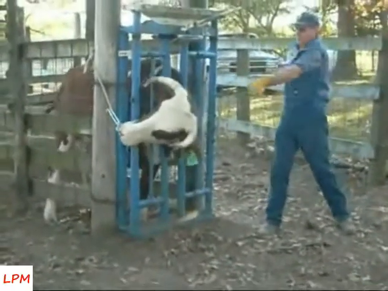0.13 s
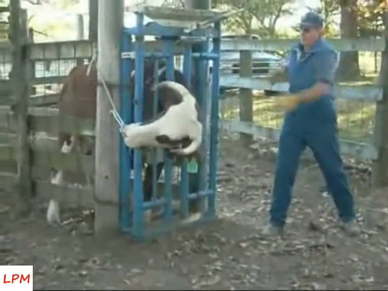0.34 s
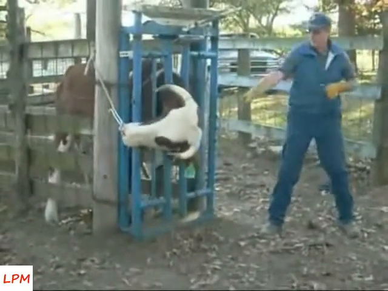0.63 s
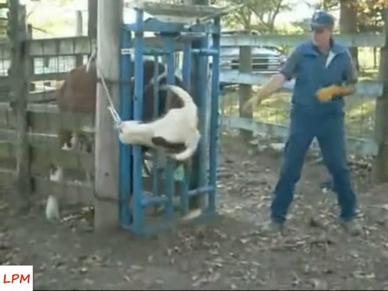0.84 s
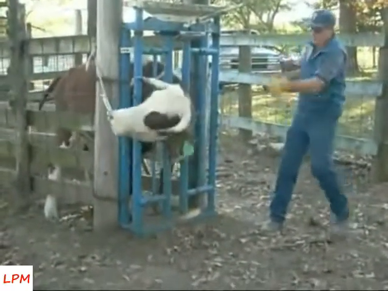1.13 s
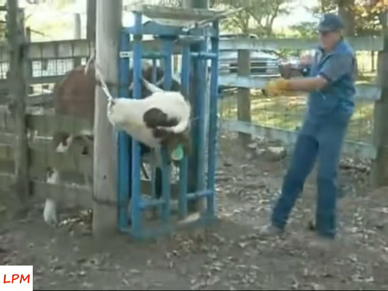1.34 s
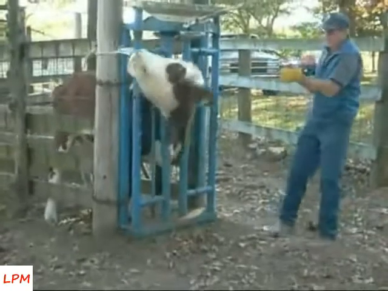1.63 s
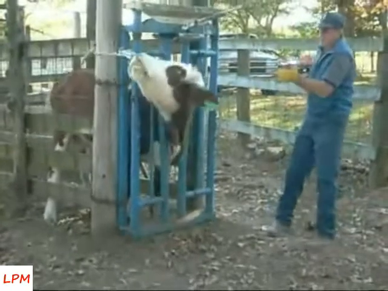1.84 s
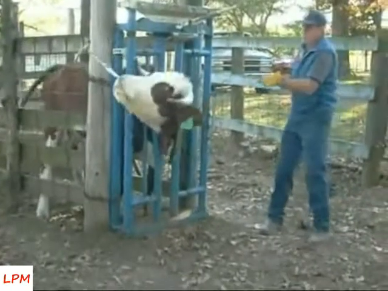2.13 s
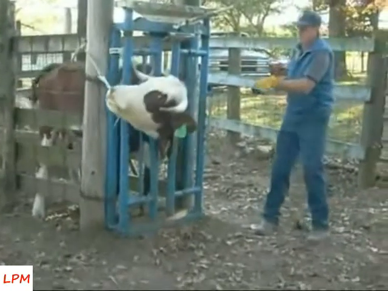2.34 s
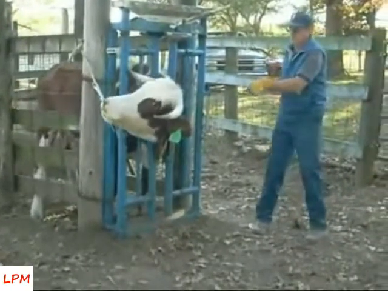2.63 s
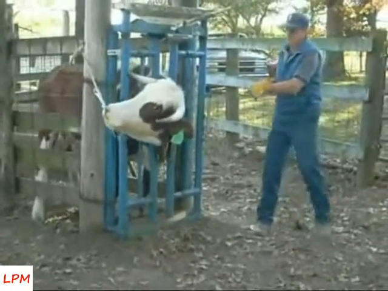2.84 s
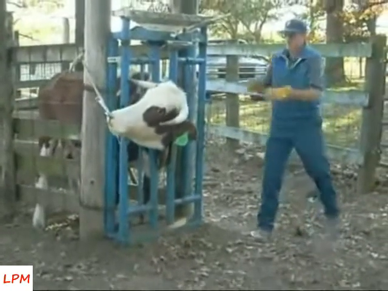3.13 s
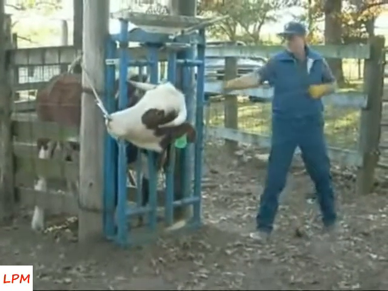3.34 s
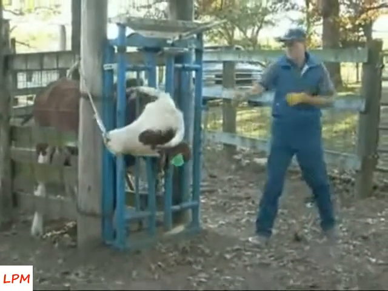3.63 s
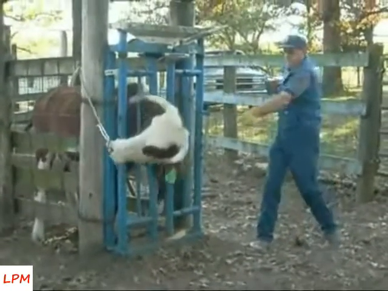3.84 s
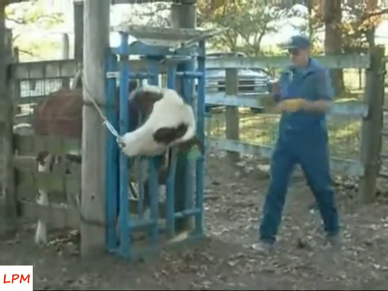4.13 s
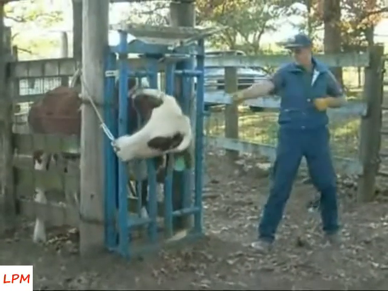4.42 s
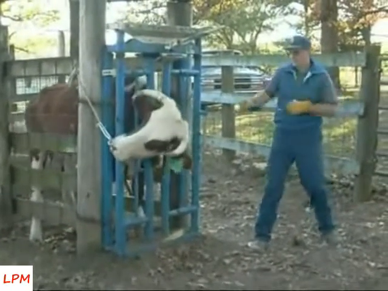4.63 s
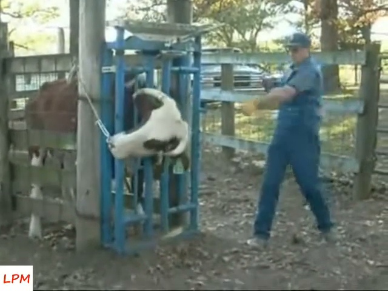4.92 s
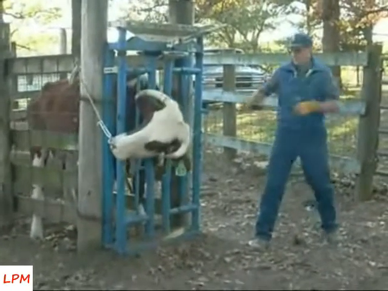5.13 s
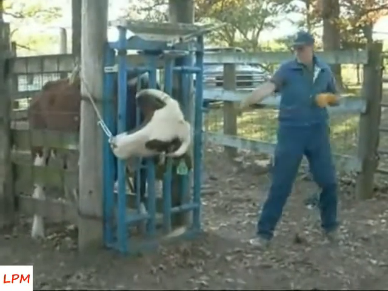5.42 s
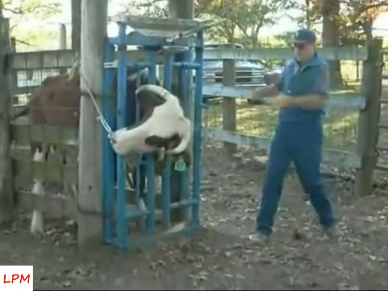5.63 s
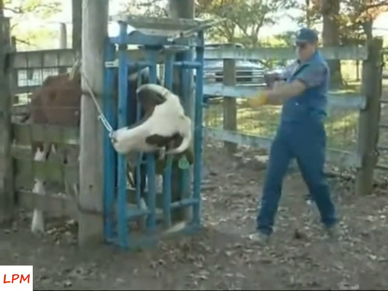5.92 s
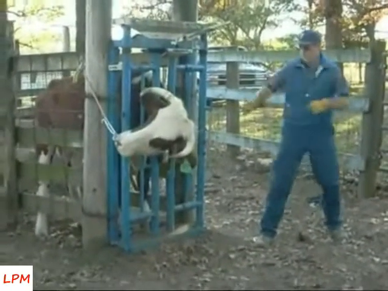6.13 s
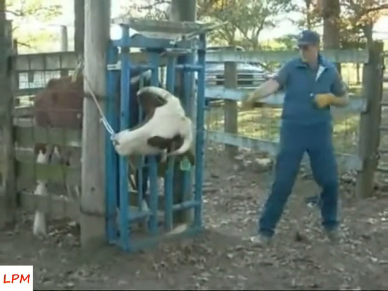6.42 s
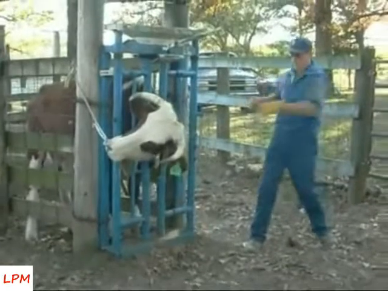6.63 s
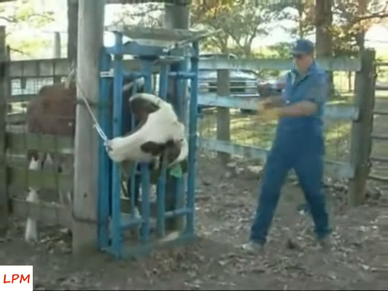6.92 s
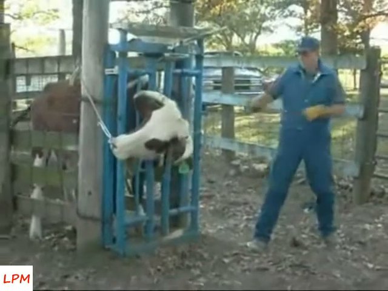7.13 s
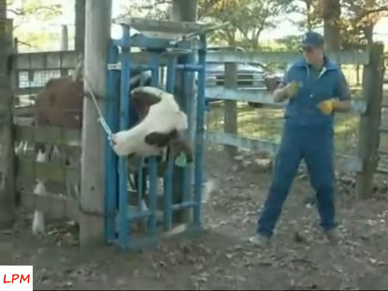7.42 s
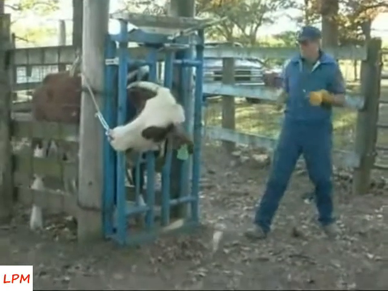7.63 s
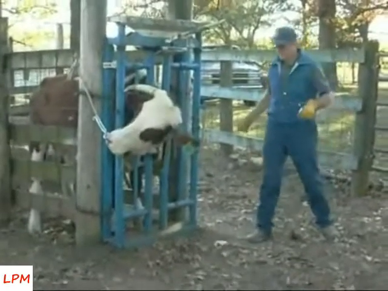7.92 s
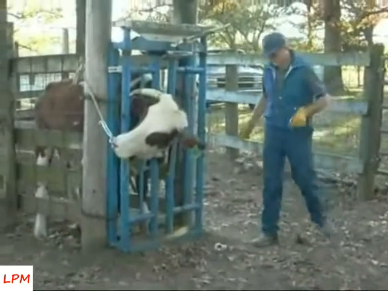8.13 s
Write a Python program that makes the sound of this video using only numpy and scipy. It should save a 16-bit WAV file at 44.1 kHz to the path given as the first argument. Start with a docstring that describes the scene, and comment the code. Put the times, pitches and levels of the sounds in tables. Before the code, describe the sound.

A wire saw rasps back and forth through a calf's horn, interrupted by loud clanks and rattles from a steel chute.

```python
"""A wire saw rasps to and fro through a calf's horn, about two strokes a second, whirring as it tightens.
The calf struggles in its steel chute: the head gate squeals by stick-slip friction, impacts set gate,
panels and floor clanking in their damped modes, and one bar rings on. Hide, rope and dry leaves rustle.
A hoof and, near the end, the cut horn knock dully on the dirt.
A thin outdoor hiss and a far engine lie underneath."""
import sys
import numpy as np
from scipy import signal
from scipy.fft import rfft, irfft, next_fast_len
from scipy.io import wavfile
from scipy.ndimage import uniform_filter1d, minimum_filter1d, map_coordinates

SR = 44100
rng = np.random.default_rng(int(sys.argv[2]) if len(sys.argv) > 2 else 0)


def materialize(psi):
    """Save the field psi as 16-bit PCM at rate SR to the path in sys.argv[1].

    A 1-D psi becomes a single channel; in a 2-D psi each row is a channel.
    """
    bounded = np.clip(np.atleast_2d(psi).T, -1, 1)
    quanta = np.round(bounded * 32767).astype(np.int16)
    wavfile.write(sys.argv[1], SR, quanta)


N = 364707


# Pulls of the saw: start_s, end_s, strength_db
SAW_STROKES = [(0, 0.278, -44), (0.475, 0.799, -44), (3.188, 3.556, -45), (3.673, 3.992, -43.5),
               (4.133, 4.548, -44), (4.652, 4.992, -44.5), (5.117, 5.476, -46), (5.601, 5.961, -48),
               (6.027, 6.411, -50.5), (6.483, 6.938, -53), (6.967, 7.339, -52), (7.218, 7.558, -52.5)]
# Spectrum of wire cutting horn: frequency_hz, level_db
RASP_SPECTRUM = [(180, -51.5), (300, -31), (382, -37), (437, -15.5), (524, -19.5), (618, -15), (677, -23),
                 (915, -12.5), (1260, -16.5), (1570, -10.5), (2360, -9), (3200, 2), (3950, -13),
                 (10200, -45), (11000, -57.5), (14300, -81), (22000, -120)]

def wire_saw(firm_db=-44.5, start_hz=520, top_hz=973, hz_per_db=12, upper_hz=1680, zing_hz=2750):
    """Friction noise: twisted wire rasps through horn, and its whirr climbs and grows with tension."""
    out = np.zeros(N)
    for start, end, strength_db in SAW_STROKES:
        effort_db = strength_db - firm_db
        size = int((end - start) * SR)
        progress = np.linspace(0, 1, size)
        speed = np.abs(np.sin(np.pi * progress))
        tension = np.sin(np.pi / 2 * progress / 0.69)  # slackens after 69% of the stroke
        low_hz = start_hz + (top_hz - start_hz) * tension + hz_per_db * effort_db
        stretch = 1 + 0.11 * (speed - speed.mean()) - 0.0601 * (progress - 0.5)
        grip = amp(3.5 * np.array([wobble(22, size) for _ in range(3)]))
        low = grip[0] * narrow_noise(low_hz, width_hz=150)
        upper = grip[1] * narrow_noise(upper_hz * stretch, width_hz=150)
        zing = grip[2] * narrow_noise(zing_hz * stretch, width_hz=200)
        # The higher resonances need a tight wire and a firm pull.
        bite = speed ** 1.22 * progress * amp(0.52 * effort_db)
        whirr = amp(-7) * speed * low + bite * (amp(2) * upper + amp(3) * zing)
        grit = patchy(noise(RASP_SPECTRUM, grain_db=1.5, size=size), depth_db=3)
        rasp = speed ** 1.12 * amp(strength_db + 1.7 * wobble(28.1, size)) * grit
        add(out, start, rasp + amp(-52.5 + 1.28 * effort_db) * whirr)
    return out


# Blows on the chute: start_s, ring_db, clatter_db, thump_db, clatter_t60_s
CHUTE_BLOWS = [(0.132, -37.5, -35.5, -61.5, 0.13), (0.158, -51, -35, -57, 0.13),
               (0.823, -23, -51, -73, .07), (0.908, -42, -46, -79, 0.24), (0.924, -32.5, -47, -80, .12),
               (0.981, -15, -21, -56, .18), (1.165, -12.5, -20.5, -46.5, 0.14),
               (1.340, -40, -36, -66, 0.38), (1.53, -38, -57, -68, .06), (1.74, -48.5, -35, -71, 0.39),
               (2.612, -45.5, -47, -83, .06), (3.902, -35, -33, -49, 0.28),
               (3.935, -29.5, -29.5, -54, 0.23), (3.972, -30.5, -34.5, -48, .25),
               (4.042, -31.5, -18.5, -25, .15), (4.083, -28, -31.5, -31.5, .15),
               (4.190, -44, -39, -49.5, 0.14), (4.329, -37, -42.5, -58, 0.19),
               (4.409, -35, -31.5, -64, 0.1), (5.104, -43.5, -38, -71, 0.11), (6.241, -41, -60, -83, .06)]

def rebounds(count=3, gap_s=0.009, t60_growth=1.46):
    """Inelastic rebound: each blow becomes a run of contacts, each weaker and looser than the last."""
    loss_db = np.array([5, 5, 9])  # ring, clatter, thump: rebounds hardly move the heavy floor
    return [(start + k * gap_s, *(np.array(levels_db) - k * loss_db), t60 * t60_growth ** k)
            for start, *levels_db, t60 in CHUTE_BLOWS for k in range(count)]


def shake(start_s=2.038, count=7, first_gap_s=0.023, gap_growth=1.16, t60_s=0.34):
    """Forced rattling: the calf throws its weight about, and slowing contacts build, hold and give out."""
    gaps = first_gap_s * gap_growth ** np.arange(count)
    starts = start_s + np.cumsum(gaps) - gaps
    onset_loss_db = 2 * 0.5 ** np.arange(count)
    fade_db = 14 * np.linspace(0, 1, count) ** 3
    levels_db = np.array([-20.5, -23, -48.5])  # ring, clatter, thump
    return [(start, *(levels_db - loss), t60_s) for start, loss in zip(starts, onset_loss_db + fade_db)]


# Modes of the gate's bars, the loose side panels and the floor: pitch_hz, level_db, t60_s
GATE_MODES = [(2094, -35.5, 0.89), (2260, -21.5, 0.12), (2480, -25, 0.26), (2555, -17.5, 0.24),
              (2710, -17.5, 0.2), (2934, -2, 0.11), (3043, -2, 0.11), (3100, -5, 0.034), (3143, 1.5, 0.077),
              (3180, -8, 0.15), (3248, -7.5, 0.2), (3340, -10.5, 0.19), (3675, -17.5, 0.14),
              (3570, -12, 0.14), (3735, -20, 0.16), (4340, -22.5, 0.18), (6700, -39.5, 0.16)]
PANEL_MODES = [(477, -17.5, 0.56), (528, -18, 0.71), (643, -14.5, 0.57), (1003, -19.5, 1), (1140, -22.5, 1),
               (1200, -22, 0.14), (1445, -18.5, 0.83), (1660, -20, 0.3)]
FLOOR_MODES = [(173, -7, 0.16), (196.4, -3.5, 0.16), (232.5, -4, 0.092), (317, -8.5, 0.16)]
# Spectra of the contact crack and the dense ring of panels and bars: frequency_hz, level_db
CRACK_SPECTRUM = [(900, -24), (3200, -1), (5000, -7), (8000, -9.5), (10800, -11.5)]
CLATTER_SPECTRUM = [(88, -69.5), (150, -22), (204, -35.5), (355, -20), (632, -8.5), (812, -14), (1010, -8),
                    (1790, -11), (2660, -8), (3180, 0), (3880, -9.5), (4240, -11.5), (5360, -22.5),
                    (6650, -26.5), (11000, -36.5), (14300, -82), (22000, -120)]

def chute_clanks():
    """Impact excitation: each contact cracks and sets the modes of gate, panels and floor ringing."""
    out, t = np.zeros(N), clock(0.6)
    attack = 1 - np.exp(-t / 0.00024)
    heave = 1 - np.exp(-t / 0.0017)  # panels and floor are slower to move
    for start, ring_db, clatter_db, thump_db, t60 in rebounds() + shake():
        crack = amp(-7 - 60 * t / 0.015) * noise(CRACK_SPECTRUM, size=len(t))
        gate = amp(ring_db) * (crack + ring(GATE_MODES, t, scatter_db=5.5, detune=0.002))
        rattle = amp(-60 * t / t60) * noise(CLATTER_SPECTRUM, grain_db=0.5, size=len(t))
        drive = amp(-3) * t60 / 0.41  # a longer rattle feeds more into the panels
        panel_ring = drive * heave * ring(PANEL_MODES, t, scatter_db=0, detune=0.0036)
        panels = amp(clatter_db) * (rattle + panel_ring)
        floor = amp(thump_db) * heave * ring(FLOOR_MODES, t, scatter_db=1.5, detune=0.01)
        cutoff_hz = 4200 * np.exp(0.039 * (ring_db + 32))  # harder blows are brighter
        add(out, start, low_pass(attack * (gate + panels + floor), cutoff_hz))
    return out


# Slips of steel on steel: start_s, length_s, level_db, start_hz, end_hz
GATE_SLIPS = [(0.816, 0.042, -8, 3040, 2898), (0.841, 0.043, -17, 2740, 2530),
              (1.093, 0.037, -32, 4820, 4820), (3.897, 0.04, -31, 663, 626), (3.906, .04, -9.5, 3080, 3047),
              (3.950, 0.025, -18, 3066, 3120), (3.984, .046, -19.5, 3110, 3130)]
# Spectrum of scraping steel: frequency_hz, level_db
SCRAPE_SPECTRUM = [(1200, -20), (2400, -13), (3200, 6), (4200, -3), (6000, -13), (8000, -17),
                   (10800, -29.5)]

def gate_squeals(peak_at=0.22, jitter=0.028, stutter_db=4, scrape_db=-19):
    """Stick-slip friction: the loaded gate gives a stuttering tone, a weak octave and a harsh scrape."""
    out = np.zeros(N)
    for start, length, level_db, start_hz, end_hz in GATE_SLIPS:
        size = int(length * SR)
        progress = np.linspace(0, 1, size)
        slip = np.sin(np.pi / 2 * np.interp(progress, [0, peak_at, 1], [0, 1, 0]))
        load = slip * np.clip(1 + (level_db + 12) / 26, 0.3, 1)
        glide_hz = start_hz + (end_hz - start_hz) * progress
        pitch_hz = glide_hz * (1 + jitter * load * wobble(450, SR)[:size])
        stutter = unit(amp(stutter_db * wobble(280, SR)[:size]))
        phase = 2 * np.pi * np.cumsum(pitch_hz) / SR
        tone = np.sin(phase) + load * amp(-26) * np.sin(2 * phase)
        scrape = amp(scrape_db) * noise(SCRAPE_SPECTRUM, size=SR // 8)[:size]
        add(out, start, amp(level_db) * slip * stutter * (tone + scrape))
    return out


def ringing_bar(start_s=2.09, stop_s=3.7, pitch_hz=622, level_db=-46, t60_s=6.1):
    """Free vibration: one lightly damped bar rings on after the shake, until a touch stops it."""
    out, t = np.zeros(N), clock(stop_s - start_s)
    edges = np.clip(np.minimum(t, t[-1] - t) / 0.0086, 0, 1)
    add(out, start_s, edges * amp(level_db - 60 * t / t60_s) * np.sin(2 * np.pi * pitch_hz * t))
    return out


# Knocks on the ground: start_s, thud_db, click_db, t60_s
GROUND_KNOCKS = [(2.895, -64.5, -70, 0.17), (6.415, -62.5, -79.5, 0.17), (7.733, -34, -39.5, 0.034),
                 (7.766, -53.5, -62, 0.034), (7.952, -57, -59, 0.032), (7.975, -62, -44.5, 0.099)]
# Spectra of the dull thud and its dry click: frequency_hz, level_db
THUD_SPECTRUM = [(53, -46), (90, -17), (209, 7.5), (368, -16), (545, 5.5), (843, -2), (1010, 5),
                 (1290, -18), (1750, -1), (2600, -14), (3380, -48), (5720, -120)]
CLICK_SPECTRUM = [(880, -13), (1500, -23), (2560, -21), (3260, -3), (3570, -11.5), (4430, -25), (9230, -41),
                  (11000, -62), (14300, -76), (22000, -120)]

def ground_knocks(gain=2.16):
    """Heavily damped impact: a hoof and the falling horn meet the dirt with a thud and a click."""
    out, t = np.zeros(N), clock(0.22)
    attack = 1 - np.exp(-t / 0.0009)
    for start, thud_db, click_db, t60 in GROUND_KNOCKS:
        thud = amp(thud_db) * noise(THUD_SPECTRUM, size=len(t))
        click = amp(click_db) * noise(CLICK_SPECTRUM, size=len(t))
        add(out, start, gain * attack * amp(-60 * t / t60) * (thud + click))
    return out


# Bouts of dry rustling: start_s, end_s, level_db, brightness_hz
RUSTLE_BOUTS = [(-0.1, 0.244, -44, 3080), (0.3, 0.8, -50, 3100), (0.89, 1.571, -42, 3310),
                (1.438, 1.99, -36, 3260), (1.8, 2.489, -44, 3230), (3.688, 4.351, -40.5, 3170),
                (6.106, 7.537, -51, 3390), (7.596, 8.444, -54.5, 3080)]
# Spectrum of the rustle: frequency_hz, level_db
RUSTLE_SPECTRUM = [(1060, -28.5), (1800, -18), (2020, -18), (2570, -10.5), (2880, -1), (3300, 2.5),
                   (3700, -11), (4110, -13), (5560, -25.5), (6420, -28), (7880, -37.5), (10100, -41.5),
                   (11000, -53), (14300, -85), (22000, -120)]

def rustling(faint_db=-58, settle_db_per_s=0.7, rise_s=0.2, fall_s=0.27, base_brightness_hz=3236):
    """Dry friction: hide, rope and leaves rub in bouts of noise over a faint, settling rustle."""
    t = np.arange(N) / SR
    rustle = amp(faint_db - settle_db_per_s * t) * noise(RUSTLE_SPECTRUM, grain_db=-0.5)
    for start, end, level_db, brightness_hz in RUSTLE_BOUTS:
        swell = np.clip(np.minimum((t - start) / rise_s, (end - t) / fall_s), 0, 1)
        spectrum = np.array(RUSTLE_SPECTRUM) * [brightness_hz / base_brightness_hz, 1]
        rustle += amp(level_db) * swell * noise(spectrum, grain_db=0.5)
    flutter = amp(0.68 * wobble(40))
    return np.std(rustle) * patchy(rustle, depth_db=1.5) * flutter


# Envelope of the body scraping along the chute: time_s, level_db
BODY_ENVELOPE = [(0.9, -53), (1.11, -56.5), (1.21, -44), (1.44, -51.5), (2.08, -54.5), (2.21, -46),
                 (2.44, -51), (2.64, -61.5), (3.1, -70)]
# Spectrum of hide on steel: frequency_hz, level_db
BODY_SPECTRUM = [(71, -63), (120, -24.5), (283, -13.5), (327, -25), (460, -4.5), (615, 2.5), (702, -8),
                 (1140, -3.5), (1770, -12.5), (2590, -13.5), (2800, -5.5), (3640, -28), (6160, -120)]

def body_scrape():
    """Sliding friction: the struggling calf drags its hide along the bars in grainy noise."""
    hide = patchy(noise(BODY_SPECTRUM, grain_db=3), depth_db=2.5)
    flutter = amp(1.8 * wobble(30))
    return envelope(BODY_ENVELOPE) * hide * flutter


# Tones of the engine: pitch_hz, level_db
ENGINE_TONES = [(70, -80), (104, -74.5)]

def far_engine(start_s=4.7, fade_s=0.43):
    """Periodic vibration: a far engine fades in as two low tones of wavering phase."""
    t = np.arange(N) / SR
    hum = sum(amp(db) * np.sin(2 * np.pi * hz * t + 0.25 * wobble(4.6)) for hz, db in ENGINE_TONES)
    return hum * np.clip((t - start_s) / fade_s, 0, 1)


# Spectrum of the outdoor air: frequency_hz, level_db
AIR_SPECTRUM = [(15, -27.5), (25, -10), (112, -6.5), (212, -11), (296, -11.5), (480, -8.5), (635, -4.5),
                (703, -9), (1230, -9.5), (3160, -9.5), (4990, -24), (10200, -21.5), (11000, -32),
                (14300, -65), (22000, -120)]

def outdoor_air(level_db=-66):
    """Stationary broadband noise: the open air gives a thin hiss."""
    return amp(level_db) * noise(AIR_SPECTRUM)


# Reverberation time of the yard: frequency_hz, t60_s
YARD_DECAY = [(150, .25), (600, 0.31), (3000, 0.54), (10000, 0.23)]

def yard_reverb(x):
    """Diffuse scattering: fences and trees return a short, exponentially decaying tail."""
    hz, t, spectra = signal.stft(rng.standard_normal(SR), SR, nperseg=256)
    decay = amp(-60 * t / along(YARD_DECAY, hz)[:, None])
    tail = signal.istft(spectra * decay, SR, nperseg=256)[1]
    return signal.fftconvolve(x, tail / np.linalg.norm(tail))[:N]


def ring(modes, t, scatter_db, detune):
    """Modal superposition: damped sines whose strength, sign and tuning vary from blow to blow."""
    hz, db, t60 = np.transpose(modes)[:, :, None]
    strength, shift, polarity = rng.standard_normal((3, len(modes), 1))
    waves = np.sign(polarity) * np.sin(2 * np.pi * hz * (1 + detune * shift) * t)
    return np.sum(amp(db + scatter_db * strength - 60 * t / t60) * waves, axis=0)


def noise(spectrum, grain_db=0, size=N):
    """Spectral shaping: coloured noise at rms 1, its power gathered in millisecond grains."""
    grains = rng.standard_normal(size) * amp(grain_db * wobble(500, size))
    return unit(filtered(grains, lambda hz: amp(along(spectrum, hz))))


def narrow_noise(hz, width_hz):
    """Quadrature modulation: a narrow band of noise follows a pitch."""
    phase = 2 * np.pi * np.cumsum(hz) / SR
    return unit(wobble(width_hz, len(hz)) * np.sin(phase) + wobble(width_hz, len(hz)) * np.cos(phase))


def patchy(x, depth_db):
    """Spectral modulation: short-lived resonances come and go; the result has rms 1."""
    spectra = signal.stft(x, nperseg=1024)[2]
    patches = uniform_filter1d(rng.standard_normal(spectra.shape), size=5, axis=0)
    patches = uniform_filter1d(patches, size=7, axis=1)
    return unit(signal.istft(spectra * amp(depth_db * unit(patches)), nperseg=1024)[1][:len(x)])


def low_pass(x, hz):
    """Causal low-pass filtering: a softer contact passes less treble."""
    return signal.sosfilt(signal.butter(2, np.clip(hz, 500, SR / 3), fs=SR, output="sos"), x)


def filtered(x, response):
    """Linear filtering: the spectrum of x times a frequency response."""
    size = next_fast_len(len(x) + 8192)
    return irfft(rfft(x, size) * response(np.fft.rfftfreq(size, 1 / SR)), size)[:len(x)]


def wobble(rate, size=N):
    """Spline interpolation: a smooth random curve with rate knots a second."""
    knots = rng.standard_normal(int(size * rate / SR) + 4)
    return map_coordinates(knots, [np.arange(size) * rate / SR])


def envelope(rows):
    """Gain per sample from (time_s, level_db) rows, fading exponentially beyond their ends."""
    times, db = np.transpose(rows)
    t = np.arange(N) / SR
    outside_s = np.maximum(times[0] - t, 0) + np.maximum(t - times[-1], 0)
    return amp(np.interp(t, times, db)) * np.exp(-outside_s / 0.026)


def along(points, hz):
    """Interpolation of (frequency_hz, value) points on a logarithmic frequency axis."""
    frequencies, values = np.transpose(points)
    return np.interp(np.log(hz + 1), np.log(frequencies + 1), values)


def add(track, start_s, x):
    """Superposition: x joins the track at start_s."""
    part = track[max(round(start_s * SR), 0):][:len(x)]
    part += x[:len(part)]


def amp(db):
    """Decibels to amplitude ratio."""
    return 10 ** (np.asarray(db) / 20)


def unit(x):
    """Normalisation to rms 1."""
    return x / np.sqrt(np.mean(x ** 2) + 1e-20)


def clock(seconds):
    """Sample times over a duration."""
    return np.arange(int(seconds * SR)) / SR


def scene(low_cut_hz=115, reverb_db=-17):
    """Superposition of all sources; the open frame and small knocks radiate little bass."""
    low_cut = signal.butter(3, low_cut_hz, "high", fs=SR, output="sos")
    blows = signal.sosfilt(low_cut, chute_clanks() + gate_squeals() + ground_knocks())
    reverb = amp(reverb_db) * yard_reverb(blows)
    foreground = wire_saw() + blows + reverb + ringing_bar() + rustling() + body_scrape()
    return (foreground + far_engine() + outdoor_air())[None]


def record(dry, ceiling=0.55, top_hz=10900):
    """Peak and band limiting: a fast gain dip holds the highest peaks, and the top treble is cut."""
    needed_gain = ceiling / np.maximum(np.abs(dry[0]), ceiling)
    gain = uniform_filter1d(minimum_filter1d(needed_gain, size=61), size=41)
    return filtered(dry[0] * gain, lambda hz: hz < top_hz)[None]


dry = scene()
out = record(dry)
materialize(out)
```